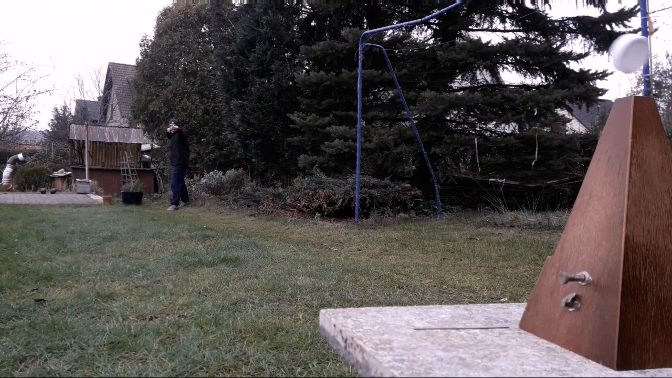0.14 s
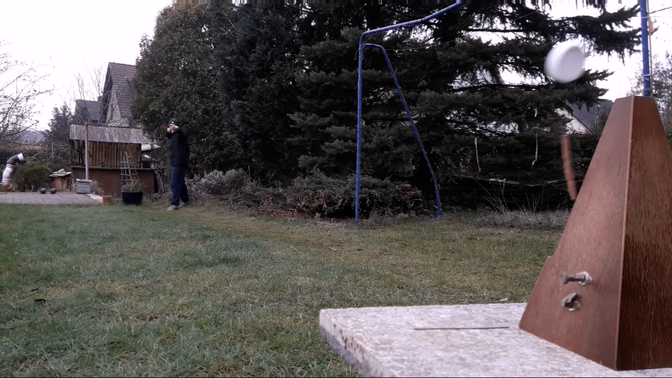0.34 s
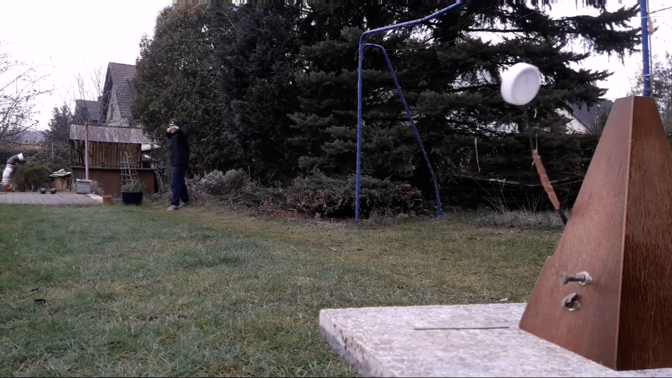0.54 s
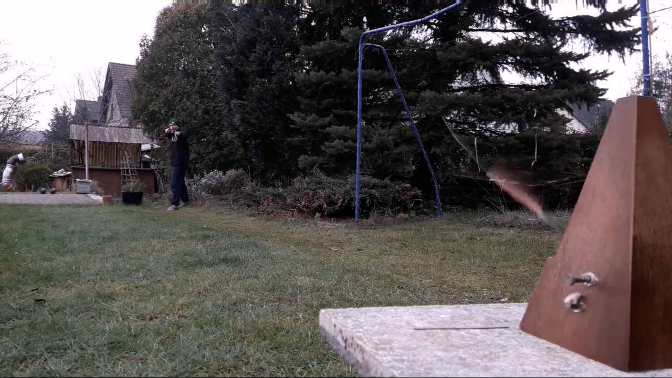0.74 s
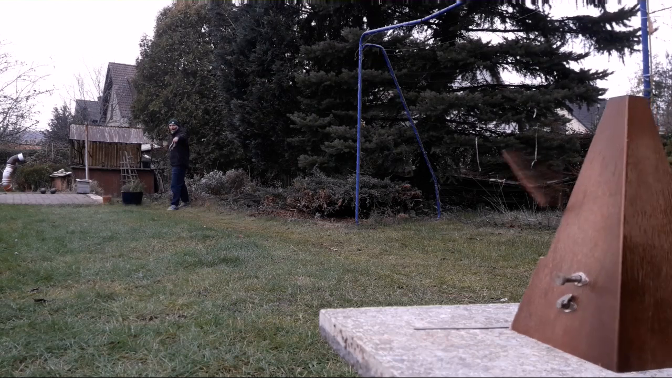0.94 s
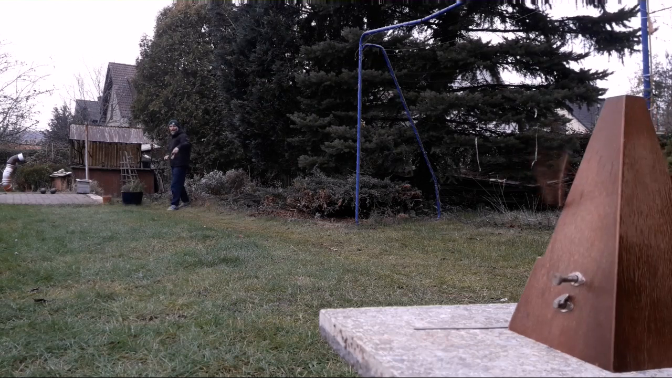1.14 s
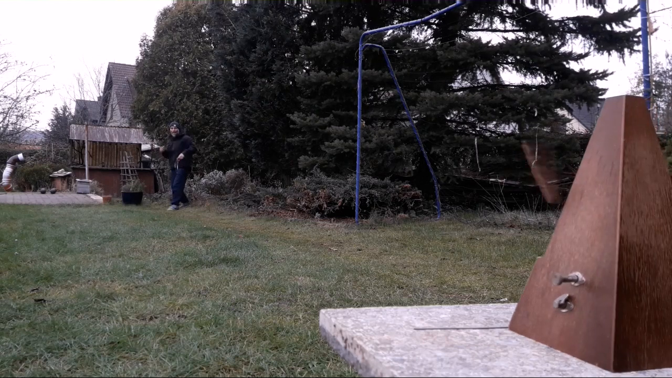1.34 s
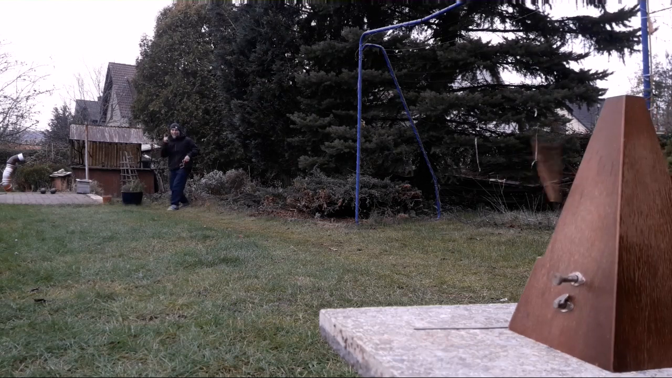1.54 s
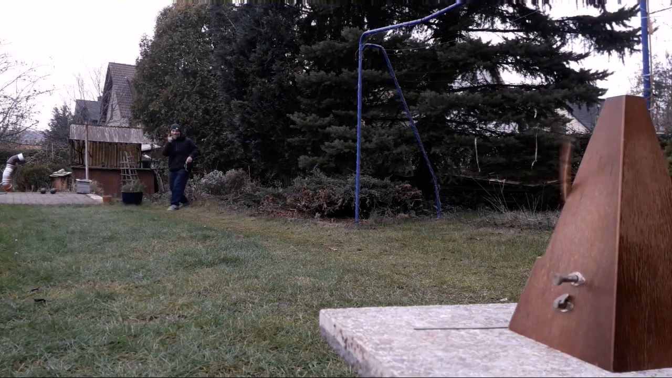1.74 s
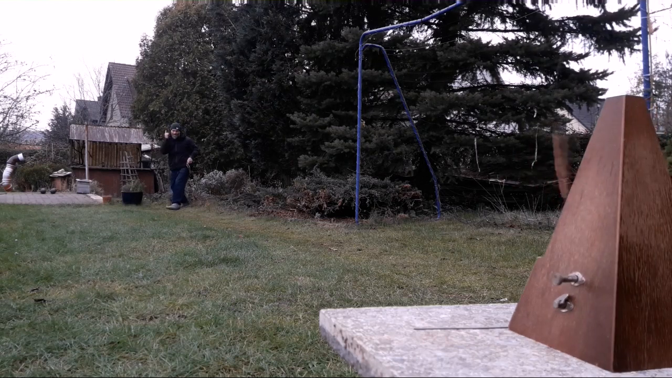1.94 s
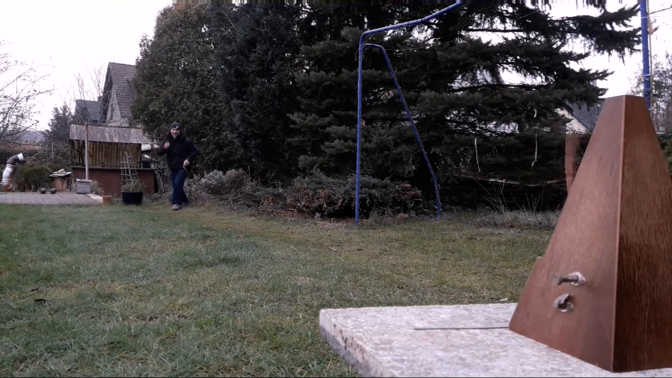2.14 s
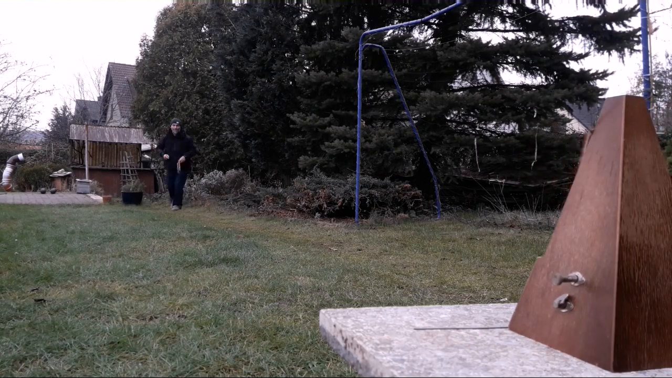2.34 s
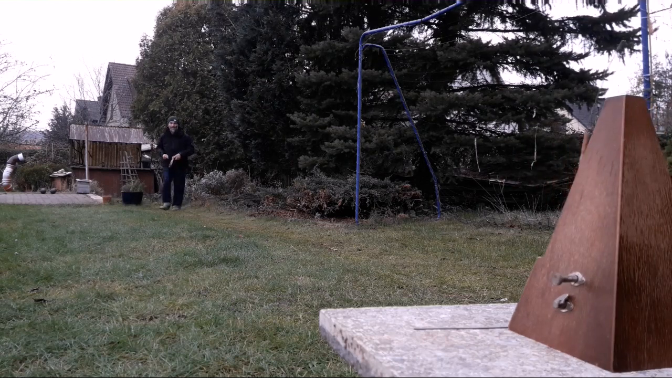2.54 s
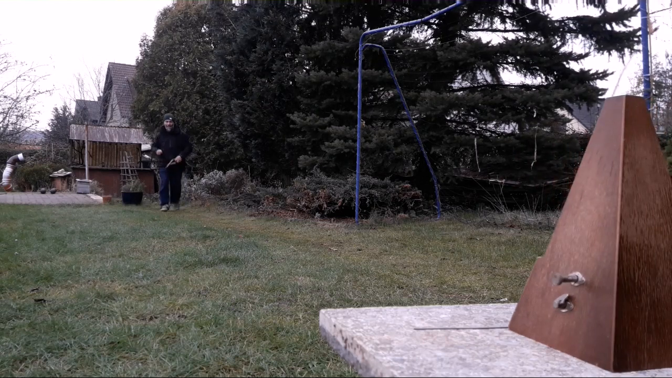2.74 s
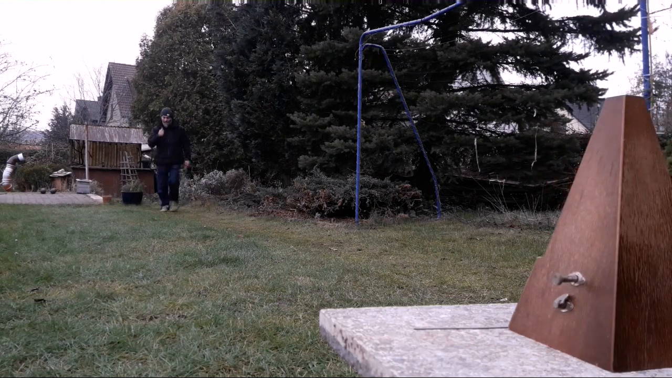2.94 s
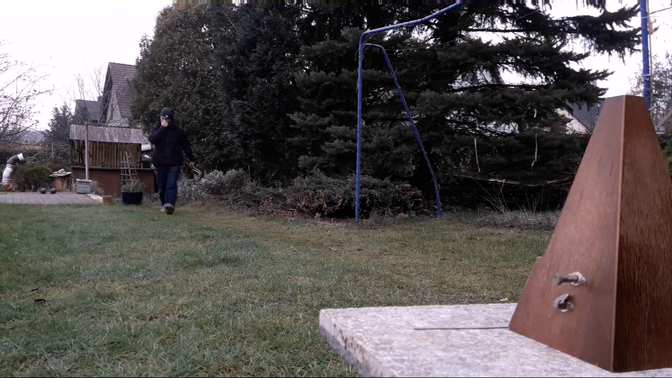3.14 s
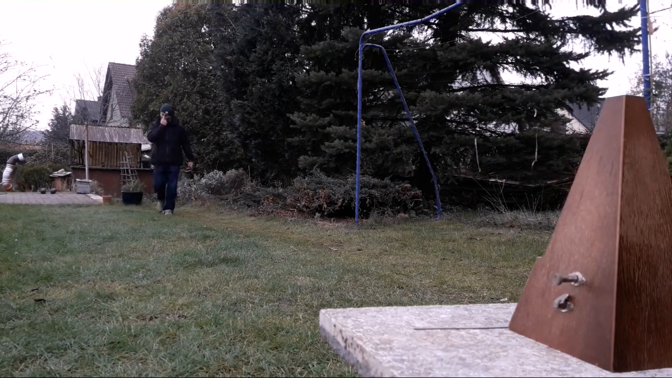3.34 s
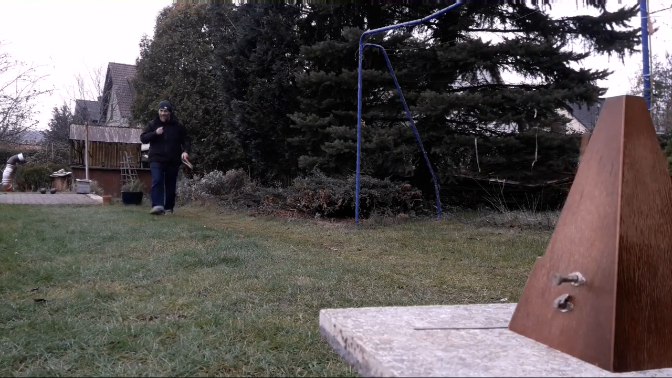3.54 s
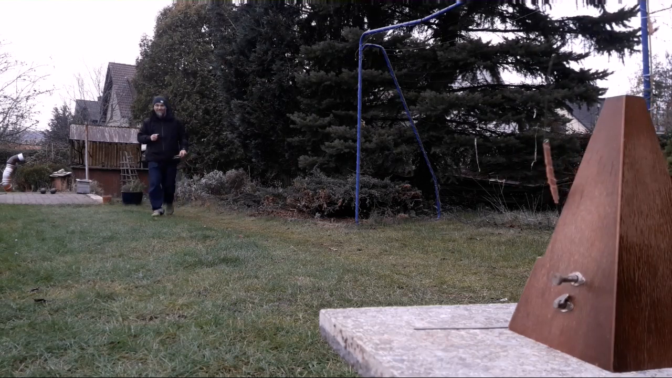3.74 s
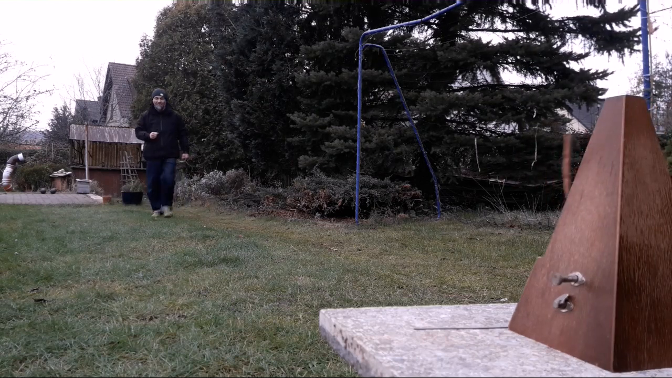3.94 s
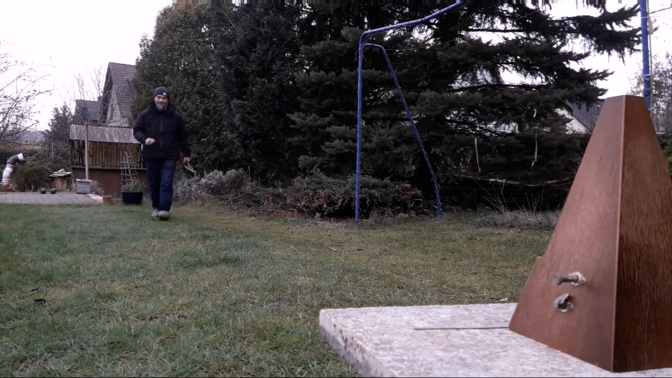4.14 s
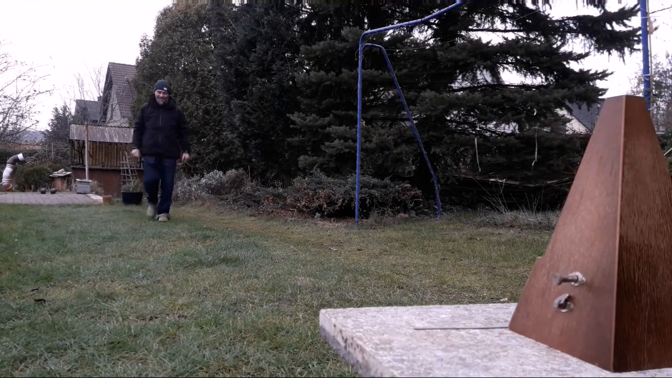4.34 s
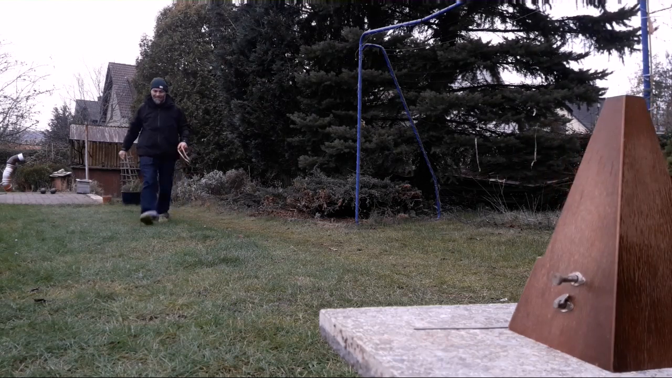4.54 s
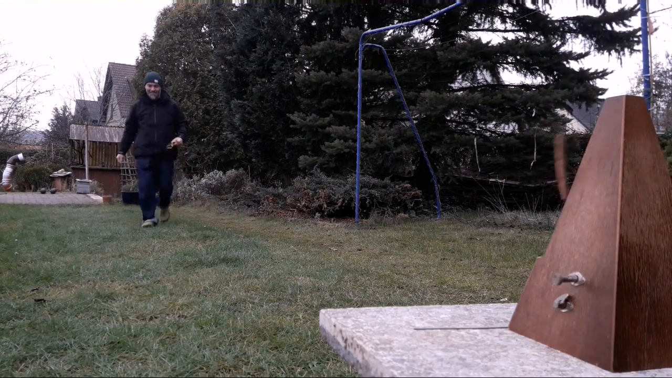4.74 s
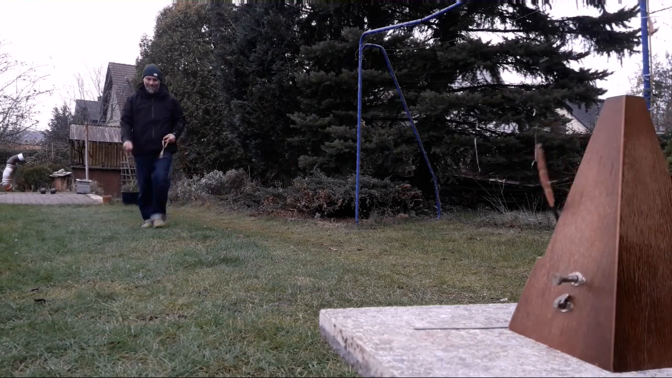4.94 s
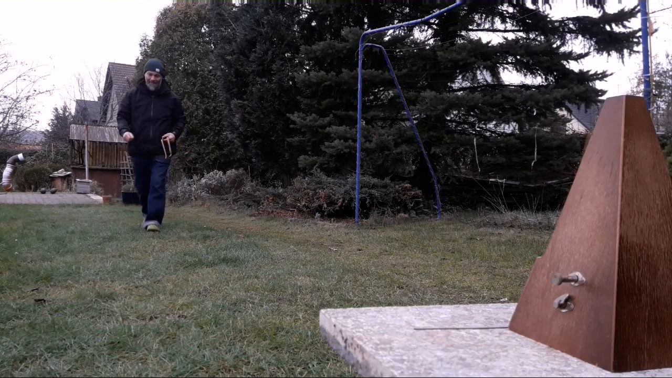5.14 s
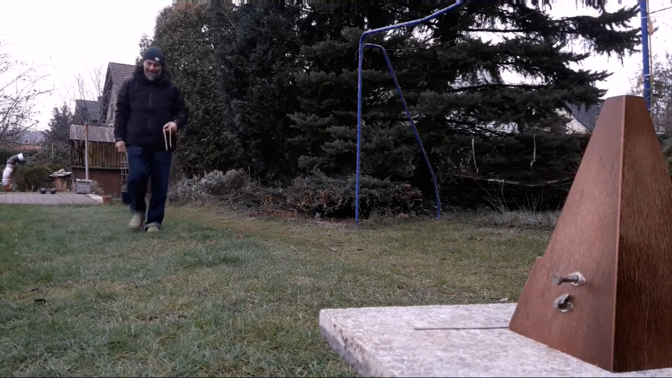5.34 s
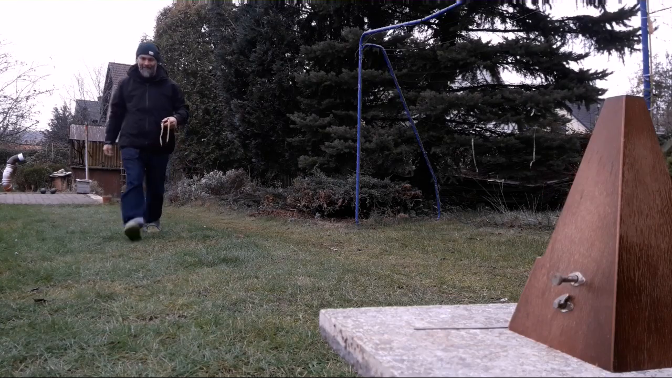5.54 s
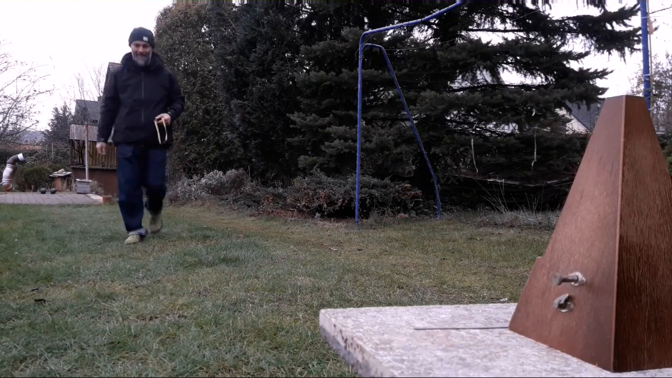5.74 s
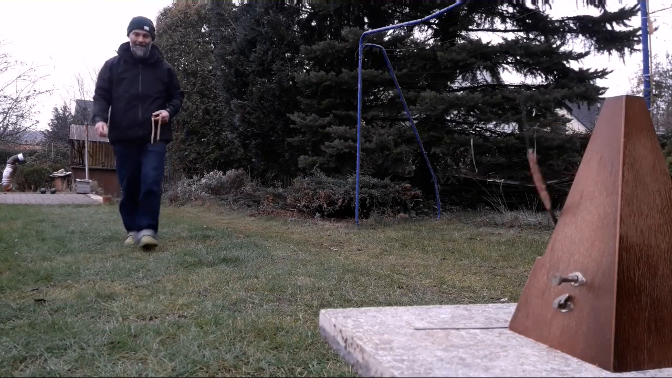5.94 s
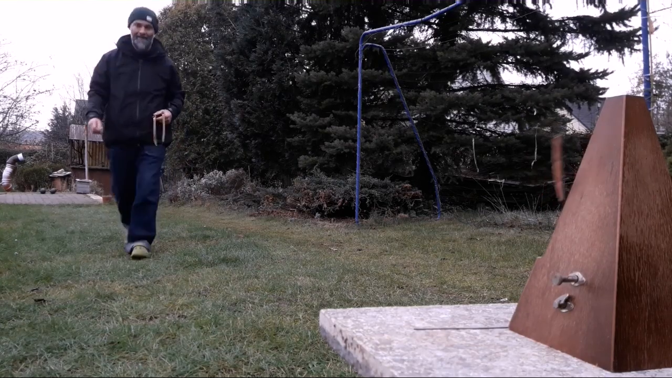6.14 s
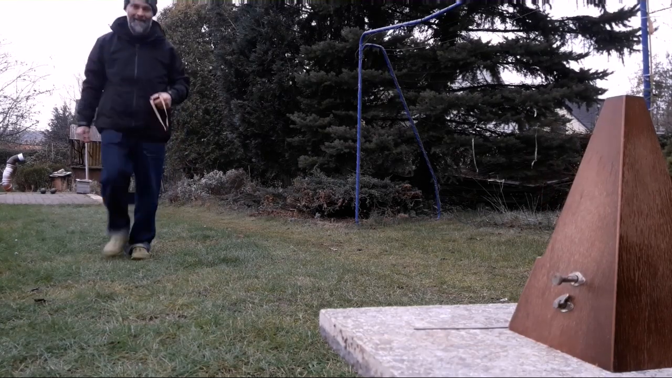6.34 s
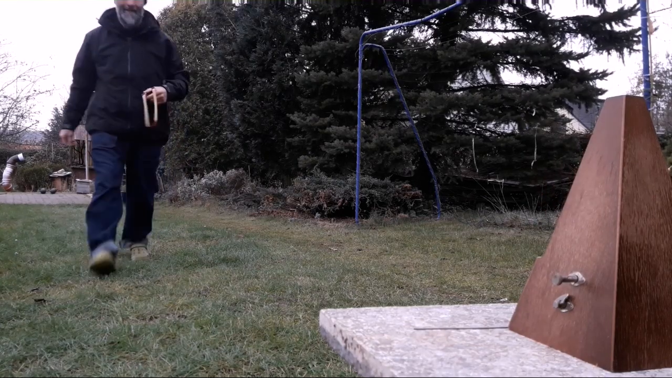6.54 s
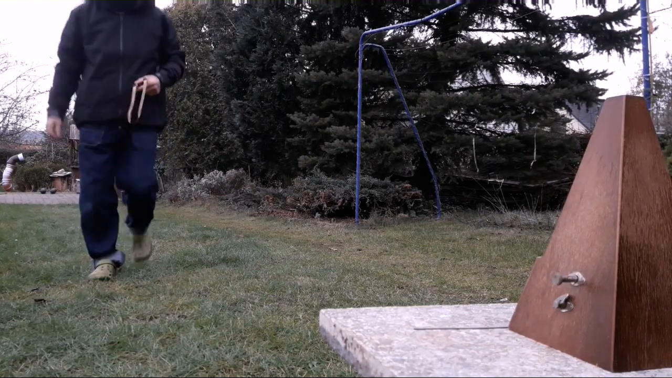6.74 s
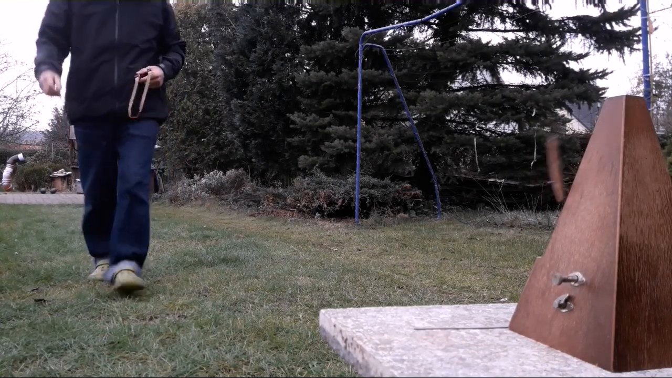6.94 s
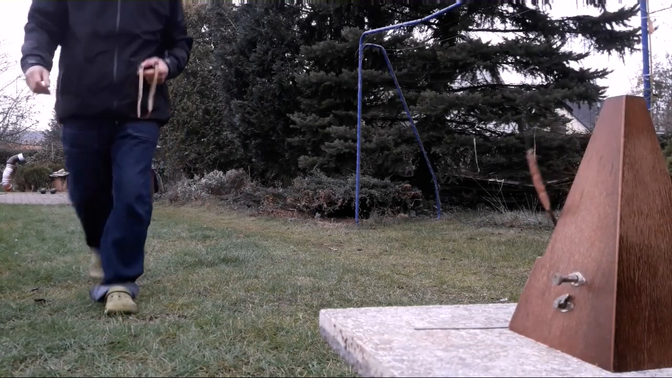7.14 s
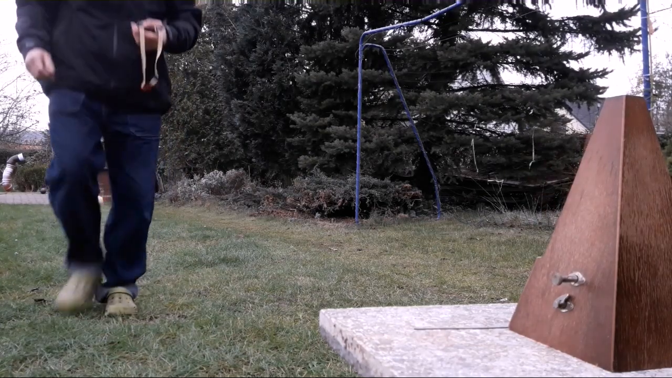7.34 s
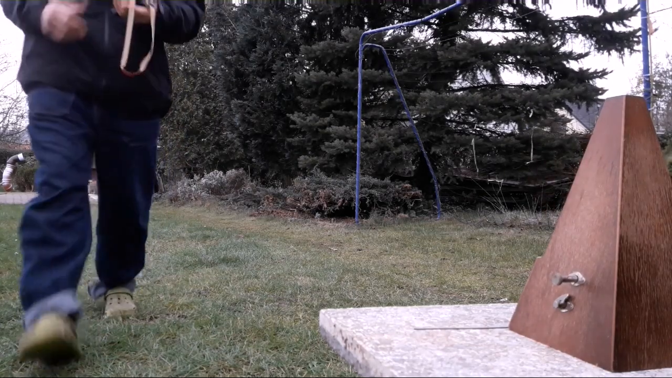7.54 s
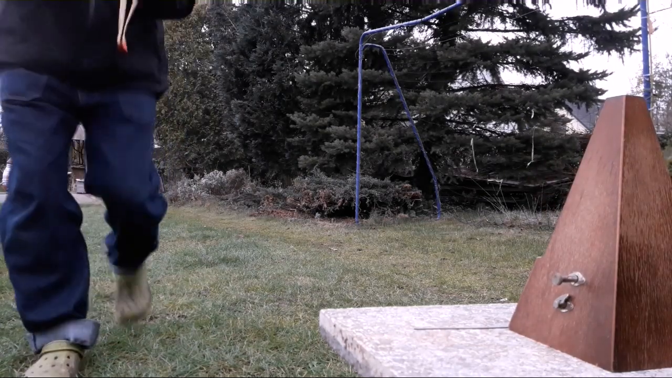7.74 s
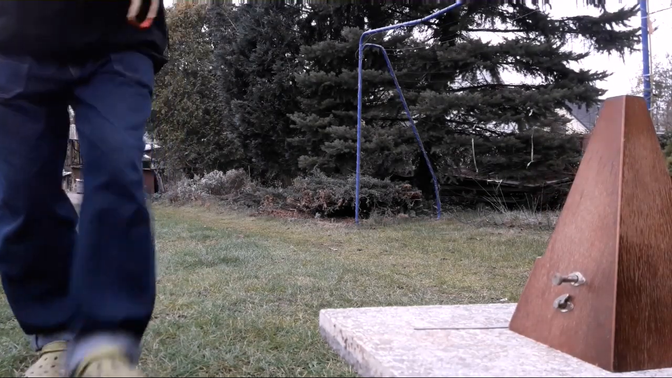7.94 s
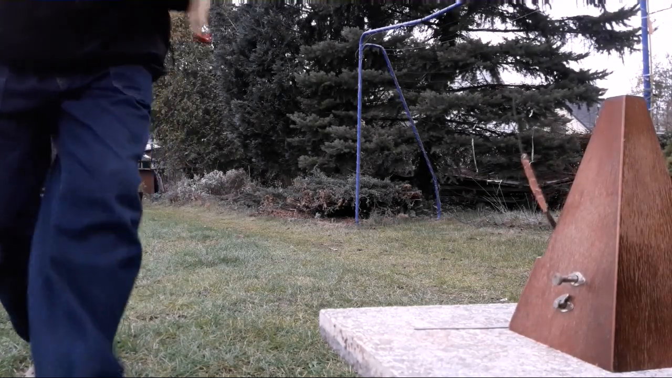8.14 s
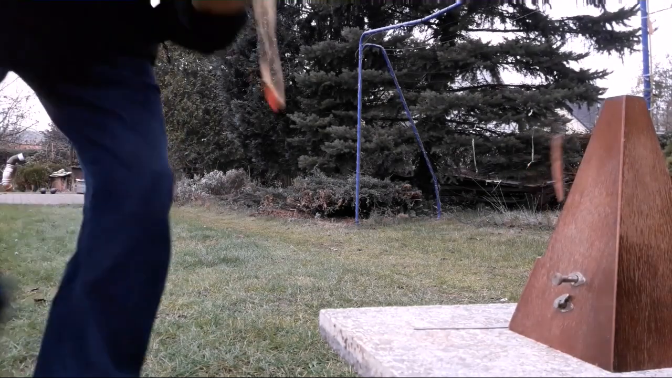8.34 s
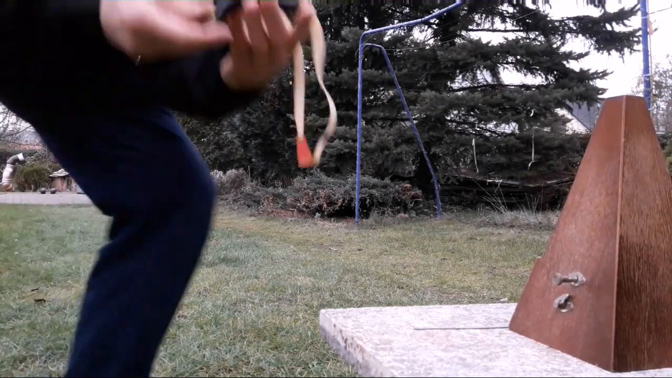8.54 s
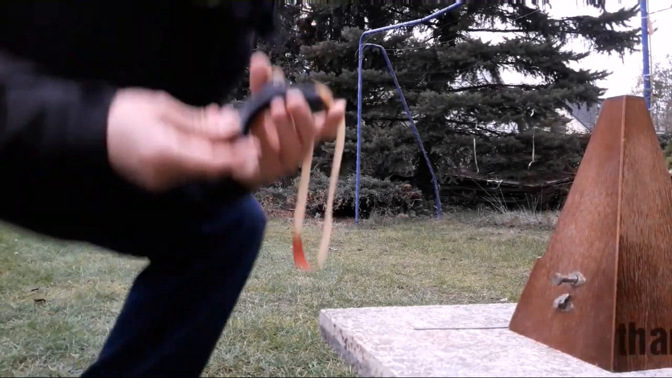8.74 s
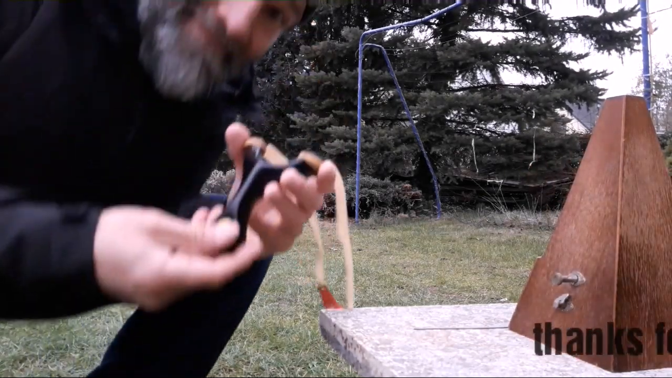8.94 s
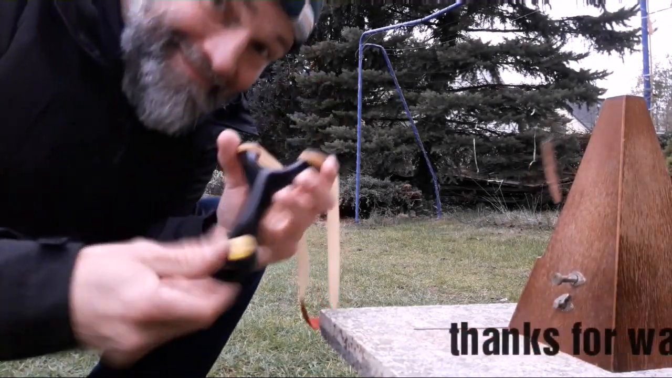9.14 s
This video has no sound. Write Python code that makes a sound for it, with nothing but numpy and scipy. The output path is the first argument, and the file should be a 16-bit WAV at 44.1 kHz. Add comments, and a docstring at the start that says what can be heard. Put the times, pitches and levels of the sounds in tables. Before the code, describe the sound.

A single crisp tock, then a sudden crack and a dense, heavy wooden clatter on a stone slab, with a low thump underneath. A loosened rod flutters in rapid weakening taps, then near silence before steady ticking, just under two per second. A walker approaches through grass from far to very near, jacket rustling and squeaking. Dry outdoor sound, close microphone, faint distant rumble and sparse short echoes.

```python
"""Metronome knocked on a garden slab

A wooden metronome ticks on a stone slab, close to the microphone: ringing wood, pin and rattling works.
A slingshot ball knocks a cap off its rod; the case slams, rocks and rattles, as bursts of noise on panels
and slab, until the beat settles. Someone walks up through grass in a rustling jacket (swelling noise,
squeaks), over distant traffic and air, with a sparse answer from walls and hedges."""
import sys
import numpy as np
from scipy import signal
from scipy.io import wavfile
from scipy.ndimage import uniform_filter1d

SR = 44100
rng = np.random.default_rng(int(sys.argv[2]) if len(sys.argv) > 2 else 0)


def dump(signal):
    """Clip the signal to [-1, 1] and save it as 16-bit WAV at the path in sys.argv[1]."""
    limited = np.clip(np.atleast_2d(signal).T, -1, 1)
    pcm = np.round(limited * 32767).astype(np.int16)
    wavfile.write(sys.argv[1], SR, pcm)


N = 409237  # samples, about 9.3 s

# All table levels are relative; each source sets its own overall level.
# distant traffic and air: hz [Hz], level_db [dB]
AIR_SPECTRUM = [(18, -39), (30, -9.5), (70, 1), (109, 0), (233, -14.5), (295, -16), (632, -23.5),
                (913, -23), (1390, -24.5), (2980, -28), (3490, -30), (6900, -38), (8520, -36.5),
                (14400, -41), (16000, -45)]
AIR_LEVEL_DB = -60.5
# dying away of the garden's answer: hz [Hz], t60_s [s]
GARDEN_DECAY = [(300, 0.056), (2000, 0.17), (8000, 0.17)]
# hiss of grass blades: hz [Hz], level_db [dB]
BLADE_SPECTRUM = [(3500, -48.5), (5200, -12), (7600, 1.5), (8800, 6), (10000, -5.5), (12600, -5.5),
                  (15000, 2), (16000, -9.5)]
# soles dragging over blades: hz [Hz], level_db [dB]
SCUFF_SPECTRUM = [(2500, -40), (3500, -9), (4800, -3.5), (6200, -2), (8000, -39.5)]
# duller body of cloth: hz [Hz], level_db [dB]
CLOTH_SPECTRUM = [(120, -40), (200, -11), (450, -5.5), (985, -9), (1640, -6.5), (2180, -8.5), (3590, -8.5),
                  (6000, -18), (7800, -41.5), (13200, -120)]
# swishes of grass under the tumbling cap, then of shoes and cloth: peak_s [s], hiss_db [dB],
# rise_s and fall_s [s per 20 dB of hiss], scuff_db and body_db [dB against hiss]
SWISHES = [(.5, -63.5, 0.22, 0.55, -14, -19), (.72, -50, .05, 0.28, -6.5, -12),
           (1.301, -71, 0.35, 0.44, -7, 11), (2.42, -65.5, 0.91, 1, -15, -0.5),
           (3.08, -63.5, 0.74, 0.33, -18, -13), (3.56, -61.5, 0.25, 0.19, -25, -12.5),
           (3.92, -55.5, 0.26, 0.28, -6.5, -9), (4.33, -50.5, 0.09, 0.2, -18.5, -10),
           (4.55, -59.5, 0.53, 0.17, -23.5, -14), (4.98, -53, 0.26, 0.22, -21, -18.5),
           (5.3, -56.5, 0.1, 0.37, -19.5, -12.5), (5.47, -44.5, 0.21, 0.18, -12, -20.5),
           (5.818, -52, 0.24, 0.5, -23, -17.5), (6.0, -65, 0.14, 0.21, -15, -2),
           (6.39, -46.5, 0.28, 0.34, -26, -17.5), (6.79, -47, 0.24, 0.23, -20.5, -18),
           (6.93, -53, 0.19, 0.11, -12, -14), (7.27, -54, 0.13, 0.18, -6.5, -7.5),
           (7.4, -47, 0.39, 0.24, -12, -13.5), (7.54, -40.5, 0.18, 0.31, -8, -10),
           (7.7, -41.5, 0.22, 0.27, -6.5, -11), (7.94, -48.5, 0.25, 0.19, -8.5, -9),
           (8.302, -43.5, .25, 0.9, -8, -5), (8.45, -34, 0.42, 0.32, -11, -12),
           (8.68, -46.5, 0.44, 0.51, -7.5, -1.5), (8.88, -48, 0.9, 0.29, -8, -9),
           (9.24, -39.5, 0.14, 0.15, -6.5, -14)]
SCUFF_STEEP, BODY_STEEP = 1.6, 1.4  # scuff and body swell and fade this much faster than the hiss
# squeaks of cloth or shoe: start_s [s], length_s [s], level_db [dB], from_hz [Hz], to_hz [Hz]
SQUEAK_EVENTS = [(7.24, 0.079, -54, 777, 990), (7.382, 0.056, -60, 2600, 2790),
                 (8.261, 0.089, -43, 1140, 1060), (8.308, 0.061, -40.5, 1610, 1900),
                 (8.391, .05, -45, 1080, 1400), (8.727, .11, -49, 1680, 1540),
                 (8.894, 0.058, -58.5, 794, 776)]
# modes of the slab and its stand: hz [Hz], level_db [dB], t60_s [s]
SLAB_MODES = [(91.26, -11.5, 0.18), (137, -11, 0.2), (255, -15.5, 0.038), (317, -20, 0.65), (393, -6, 0.22),
              (615, -19.5, 0.31)]
# blows heavy enough to move the slab: start_s [s], level_db [dB]
SLAB_BLOWS = [(0.672, -42.5), (0.783, 1.5), (0.792, -19), (0.837, -4), (1.018, -22), (1.561, -54),
              (2.173, -50)]
# something hollow bounces to rest: start_s [s], level_db [dB]
HOLLOW_BOUNCES = [(2.759, -56), (2.812, -63), (2.867, -74), (3.559, -66.5)]
# modes of the hollow thing: hz [Hz], level_db [dB], t60_s [s]
HOLLOW_MODES = [(621, 5.5, 0.31), (2430, -2, 0.068)]
# its contact: level_db [dB over the ring], treble_db [dB], wood_db [dB], t60_s [s], panel_hz [Hz]
HOLLOW_CONTACT = (18, 3, 0, 0.11, 1817)
# the freed rod quivers about twelve times a second and taps twice a swing:
# start_s [s], level_db [dB], return_after_s [s], return_db [dB]
ROD_SWINGS = [(1.075, -8, 0.022, -16), (1.152, -13, 0.026, -24.5), (1.23, -17, 0.03, -25),
              (1.313, -20.5, 0.026, -26), (1.396, -22, 0.028, -29.5), (1.481, -25, 0.022, -29.5),
              (1.561, -13, 0.035, -22), (1.644, -38, 0.036, -34), (1.731, -44.5, 0.035, -34.5),
              (1.819, -43, 0.031, -39), (1.907, -48, 0.031, -44), (1.997, -48, 0.027, -35),
              (2.081, -43, .028, -43), (2.17, -24.5, .025, -26), (2.258, -26, 0.024, -29),
              (2.348, -37, 0.02, -32), (2.435, -37.5, 0.019, -35.5), (2.518, -37, 0.025, -40)]
TAP_TREBLE_DB, TAP_WOOD_DB, TAP_T60_S = -5.5, -9.5, 0.045  # wood share is that of the loudest tap
SOFT_WOOD = 0.14  # dB more wood for each dB that a tap is weaker than the loudest
TAP_OUT_HZ, TAP_BACK_HZ = 1892, 1649  # nominal panels hit on the way out and back
CHATTER_S, CHATTER_DB = 0.014, -9  # the return tap bounces once
# the bands snap far off, the ball grazes and strikes the cap, its echo returns: start_s [s],
# level_db [dB], treble_db [dB], wood_db [dB, share through the wood], t60_s [s], panel_hz [Hz, nominal]
SHOT_BLOWS = [(.646, -34.5, 19.5, -2, 0.022, 1491), (.670, -24, 26.2, -16, 0.017, 1500),
              (.6741, -3, 3, -20, .012, 1500), (.677, -37, 16, -21.5, 0.21, 1511)]
# blows of cap and case, and a few stray taps later: start_s [s], level_db [dB], treble_db [dB],
# wood_db [dB, share through the wood], t60_s [s], panel_hz [Hz, nominal]
CASE_BLOWS = [(0.78, 5, -2, -13, 0.042, 800), (0.789, 4, 1, -16, 0.09, 1860), (0.8, 0, -3, -2, 0.22, 1660),
              (0.814, 4.5, -3, -24, 0.12, 1760), (0.827, -3, -3, -8.5, 0.12, 1460),
              (0.842, -5.5, 5, -2, 0.07, 607.5), (0.852, -16.5, 16, -2, 0.07, 1562),
              (0.862, -5.5, 4, -19, 0.099, 1800), (0.881, -9, -10, -21, 0.12, 2320),
              (0.926, -10, 6.5, 2.5, 0.063, 2080), (0.94, -6, -7, -3.5, 0.088, 1720),
              (0.951, -20.5, -16.5, 6.5, 0.034, 1740), (0.999, -5, -3.5, -7, 0.023, 1950),
              (1.015, 6, 2.5, -17, 0.046, 1180), (1.038, -22, -24, 8, 0.11, 1076),
              (1.277, -12.5, -2, -30, 0.04, 2300), (1.373, -33.5, -14, -5, 0.19, 960),
              (1.562, -19.5, -2, -3.5, 0.11, 770), (1.624, -37, -7, -5, 0.19, 676),
              (1.996, -46, -11, 8, 0.07, 1190), (2.596, -31.5, 11, 2, 0.04, 1835),
              (5.222, -48.5, 3, -7, 0.091, 643), (5.808, -48, -2.5, 1, 0.051, 1840),
              (7.852, -50.5, -4, -1.5, 0.16, 770), (8.225, -30.5, 9.5, -8, 0.021, 1170),
              (8.995, -40.5, -0.5, -7, 0.035, 651)]
# direct sound of the tiny collisions: hz [Hz], level_db [dB]
CLATTER_SPECTRUM = [(120, -34), (200, -10), (400, -16), (900, -14), (1500, -11.5), (3500, -10), (5300, -14),
                    (8700, -6), (11000, -19), (16000, -37)]
PANEL_T60_S, PANEL_SPREAD = 0.022, 0.04  # each blow lands a little elsewhere: random share of panel_hz
# escapement beats, a little uneven from side to side: start_s [s], level_db [dB],
# pin_db [dB, pin against wood]
ESCAPEMENT_BEATS = [(0.4238, -11.5, 1), (3.1811, -10, -1), (3.7429, -8, -1.5), (4.2651, -10.5, 2),
                    (4.829, -9, 1), (5.3544, -8, 1), (5.919, -9, -2), (6.4403, -8, 1.5),
                    (7.0023, -9.5, 2.5), (7.5311, -7.5, 2), (8.0967, -10, 4), (8.625, -5, 5.5),
                    (9.184, -9, 3)]
# modes of the wooden case: hz [Hz], level_db [dB], t60_s [s, before the pin stills the case]
CASE_MODES = [(312, -12, 0.039), (564, -56, 0.0057), (856, -5, 0.023), (1220, -32, 0.067),
              (1390, -6, 0.054), (1720, -43, 0.067), (1826, 18, 0.05), (2210, -34, 0.016),
              (2339, 13, 0.054), (2440, -17, 0.089), (2720, -1.5, 0.12), (2870, -38.5, 0.031),
              (3726, 2.5, 0.064), (4058, 7, 0.044), (3990, 0, 0.073), (5620, -57, 0.045),
              (6480, -18, 0.045)]
# the panel under the works gives one dead swing: hz [Hz], level_db [dB], t60_s [s]
PANEL_SWING = [(2100, 0, .006)]
# rattle of the works: hz [Hz], level_db [dB]
RATTLE_SPECTRUM = [(200, -18.5), (600, -11), (1200, -4.5), (2200, -1), (3200, -8.5), (5000, -9.5),
                   (7500, -12), (16000, -20)]
# modes of the escapement pin: hz [Hz], level_db [dB], t60_s [s]
PIN_MODES = [(6750, -3, .008), (7200, -5, .007), (7900, -6, .007), (8300, 0, .009), (8900, -10, .006)]
# the pin touches, drops and rebounds within a beat: delay_s [s, nominal], level_db [dB, nominal]
PIN_REBOUNDS = [(-.002, -32), (0, 0), (.0021, -6), (.0057, -4), (.0108, -11)]
# side channel against mid: hz [Hz], level_db [dB]
SIDE_SPECTRUM = [(60, -41.5), (400, -32), (2000, -22), (6000, -19), (15000, -12)]
EDGE_HZ = 16300  # upper band limit
HELD_PEAK_FALL_DB_PER_S = 9  # how fast the gain control lets go of a past peak level


def amp(db):
    """Gain of a level in dB."""
    return 10 ** (np.asarray(db) / 20)


def evened(x):
    """Scaled to rms 1."""
    return x / np.sqrt(np.mean(x ** 2) + 1e-20)


def read(points, hz):
    """A table read on a log-frequency axis."""
    f, value = np.transpose(points)
    return np.interp(np.log(hz + 1), np.log(f + 1), value)


def add(mix, s, sound):
    """Mixes a sound in at time s."""
    part = mix[round(s * SR):][:len(sound)]
    part += sound[:len(part)]


def colour(points):
    """Causal (minimum-phase) impulse response of energy 1 with the given spectrum."""
    level_db = np.maximum(read(points, abs(np.fft.fftfreq(4096, 1 / SR))), -90)
    spectrum = np.exp(np.conj(signal.hilbert(np.log(amp(level_db)))))
    response = np.fft.ifft(spectrum).real[:2048]
    return response / np.linalg.norm(response)


def ring(modes, spread_db=0, size=3000):
    """Dying sines struck together, peak 1; mode levels vary at random by spread_db."""
    t = np.arange(size) / SR
    hz, db, t60 = np.transpose(modes)[:, :, None]
    db = db + spread_db * rng.standard_normal(db.shape)
    x = (amp(db - 60 * t / t60) * np.sin(2 * np.pi * hz * t)).sum(0)
    return x / abs(x).max()


def noise(points, patchy_db, flicker_db, size=512):
    """Noise with drifting patches and a flicker shared by all pitches."""
    frames, hz = 4 * N // size + 5, np.fft.rfftfreq(size, 1 / SR)
    a, b, patches = rng.standard_normal((frames, len(hz), 3)).T
    patches = uniform_filter1d(patches, 8, 0)  # across pitch
    patches = evened(uniform_filter1d(patches, 12, 1))  # across time
    flicker = evened(uniform_filter1d(rng.standard_normal(frames), 3))
    level_db = read(points, hz)[:, None] + patchy_db * patches + flicker_db * flicker
    x = signal.istft((a + 1j * b) * amp(level_db), nperseg=size, noverlap=3 * size // 4)[1]
    return evened(x[:N])


def distant_air():
    """Low, slightly flickering noise of distant traffic and air."""
    return amp(AIR_LEVEL_DB) * noise(AIR_SPECTRUM, patchy_db=1.13, flicker_db=2.5, size=2048)


def garden(x):
    """Walls and hedges answer from about 30 ms on: sparse echoes, each pitch dying at its own rate."""
    echoes = np.zeros(SR // 2)
    at = np.arange(1300, len(echoes) - 20, 20)
    echoes[at + rng.integers(0, 20, len(at))] = rng.choice([-1., 1.], len(at))
    hz, t, z = signal.stft(echoes, SR, nperseg=256)
    decay = amp(-60 * t / read(GARDEN_DECAY, hz)[:, None])
    tail = signal.istft(z * decay, SR, nperseg=256)[1]
    return signal.oaconvolve(x, tail / np.linalg.norm(tail))[:N]


def rustle():
    """Hiss of blades, scuffing soles and the duller body of cloth swell with each stride."""
    s, hiss_db, rise, fall, scuff_db, body_db = np.transpose(SWISHES)[:, :, None]
    t = np.arange(0, N, 64) / SR
    away_db = -20 * np.maximum((s - t) / rise, (t - s) / fall)

    def swell(db):
        """Swishes overlap by adding their powers."""
        return np.interp(np.arange(N) / SR, t, np.linalg.norm(amp(db), axis=0))

    hiss = swell(hiss_db + away_db)
    scuff = swell(hiss_db + scuff_db + SCUFF_STEEP * away_db)
    body = swell(hiss_db + body_db + BODY_STEEP * away_db)
    grass = hiss * noise(BLADE_SPECTRUM, patchy_db=-0.94, flicker_db=1.07)
    grass += scuff * noise(SCUFF_SPECTRUM, patchy_db=6.0, flicker_db=0.5)
    return grass + body * noise(CLOTH_SPECTRUM, patchy_db=1.5, flicker_db=1.5)


def squeak(length, db, from_hz, to_hz, width_hz=180):
    """Stick and slip: broken rubbing noise in a narrow gliding band, with its octave."""
    hz = np.linspace(from_hz, to_hz, round(length * SR))
    turn = np.exp(2j * np.pi * np.cumsum(hz) / SR)
    r = np.exp(-np.pi * width_hz / SR)
    rub, grip = rng.standard_normal((2, 8000))[:, :len(hz)]
    # two equal poles at zero pitch, carried along the glide
    band = turn * signal.lfilter([1], np.convolve([1, -r], [1, -r]), rub / turn)
    tone = evened(band.real) + amp(-11) * evened((band ** 2).real)  # squaring doubles the pitch
    broken_db = 1.8 * evened(uniform_filter1d(grip, 300))
    return amp(db + broken_db) * tone * signal.windows.tukey(len(hz), 0.7)


def slab():
    """A soft push, then the low ring of the slab."""
    out = np.zeros(N)
    u = np.arange(800) / SR / 0.0011
    push = u * (2 - u) * np.exp(-u)
    for s, db in SLAB_BLOWS:
        add(out, s, -amp(db + 1) * push)
        add(out, s, -amp(db - 12) * ring(SLAB_MODES, spread_db=1, size=20000))
    return out


def hollow_ring():
    """The hollow thing sounds its two modes at each bounce."""
    out = np.zeros(N)
    for s, db in HOLLOW_BOUNCES:
        add(out, s, amp(db) * ring(HOLLOW_MODES, size=9000))
    return out


def light_taps():
    """Contacts of hollow thing and quivering rod, in the columns of the case blows; soft taps are woodier."""
    contact_db, *contact = HOLLOW_CONTACT
    hollow = [(s, db + contact_db, *contact) for s, db in HOLLOW_BOUNCES]
    hits = []
    for s, db, lag, back_db in ROD_SWINGS:
        hits.append((s, db, TAP_OUT_HZ))
        hits.append((s + lag, back_db, TAP_BACK_HZ))
        hits.append((s + lag + CHATTER_S, back_db + CHATTER_DB, TAP_OUT_HZ))
    top_db = max(db for s, db, hz in hits)
    rod = []
    for s, db, hz in hits:
        wood_db = TAP_WOOD_DB + SOFT_WOOD * (top_db - db)
        rod.append((s, db, TAP_TREBLE_DB, wood_db, TAP_T60_S, hz))
    return hollow + rod


def knocks():
    """Bursts of tiny collisions, heard directly and through the panel that is hit."""
    dull, bright, wood = np.zeros((3, N))
    t = np.arange(8000) / SR
    onset = 1 - np.exp(-t / 0.0011)
    main_hz = CASE_MODES[6][0]
    for s, db, treble_db, wood_db, t60, hz in SHOT_BLOWS + CASE_BLOWS + light_taps():
        grit, lumps = rng.standard_normal((2, len(t)))
        uneven_db = 2.2 * evened(uniform_filter1d(lumps, 60))  # collisions come in clumps
        burst = amp(db - 9.5 - 60 * t / max(t60, 0.004) + uneven_db) * onset * grit
        panel_hz = hz * (1 + PANEL_SPREAD * lumps[0])
        # the panel, with a trace of the main mode of the case
        panel = ring([(panel_hz, 0, PANEL_T60_S), (main_hz, -5, PANEL_T60_S)], size=2000)
        add(dull, s, burst)
        add(bright, s, amp(treble_db) * burst)
        add(wood, s, amp(wood_db) * signal.oaconvolve(burst, panel / np.linalg.norm(panel)))
    low = signal.butter(3, 5000, fs=SR, output="sos")
    high = signal.butter(3, 5000, "high", fs=SR, output="sos")
    direct = signal.sosfilt(low, dull) + signal.sosfilt(high, bright)
    return wood + signal.oaconvolve(direct, colour(CLATTER_SPECTRUM))[:N]


def metronome():
    """One blow rings the wood; the pin rebounds unevenly, the works rattle. Also the cracks that carry far."""
    near, far = np.zeros((2, N))
    crack, t = colour(RATTLE_SPECTRUM), np.arange(3000) / SR
    spreading = 1 - np.exp(-(t / 0.00035) ** 2)  # the blow takes a moment to reach every panel
    settling = np.exp(-(t / 0.022) ** 2)  # the pin comes to rest on the wheel and stills the case
    touch = np.minimum(t / 0.00027, 1)
    for s, db, pin_db in ESCAPEMENT_BEATS:
        add(near, s, amp(db - 4.5) * ring(CASE_MODES, spread_db=3) * spreading * settling)
        add(near, s, amp(db + 3) * ring(PANEL_SWING) * spreading)
        grit = np.convolve(rng.standard_normal(len(t)), crack)[:len(t)]
        rattle = amp(db - 60 * t / 0.061) * grit
        add(near, s, amp(-19) * rattle)
        add(far, s, amp(-6) * rattle)
        for delay, rebound_db in PIN_REBOUNDS:
            late, weak = rng.standard_normal(2) * abs(delay)  # later rebounds vary more
            pin = ring(PIN_MODES, spread_db=15.5) * touch
            add(near, s + delay + 0.082 * late, amp(db + rebound_db + pin_db + 75 * weak) * pin)
    return near, far


def scene():
    """All sources around the slab; the two channels differ only faintly, by a side of random phase."""
    beats, far_cracks = metronome()
    clatter = knocks() + hollow_ring()
    rubs = rustle()
    for start, *row in SQUEAK_EVENTS:
        add(rubs, start, squeak(*row))
    answer = amp(-27.5) * garden(far_cracks + clatter)
    mono = distant_air() + answer + rubs + slab() + clatter + beats
    hz, t, z = signal.stft(mono, SR, nperseg=256)
    random_phase = np.exp(2j * np.pi * rng.random(z.shape))
    side = signal.istft(z * amp(read(SIDE_SPECTRUM, hz))[:, None] * random_phase, nperseg=256)[1][:N]
    return np.array([mono + side, mono - side])


def record(dry):
    """Microphone roll-offs and preamplifier hiss; gain dips after loud peaks, peaks round off; band limit."""
    heard = signal.sosfilt(signal.butter(2, 45, "high", fs=SR, output="sos"), dry)
    softened = signal.sosfilt(signal.butter(8, 10000, fs=SR, output="sos"), heard)
    heard = 0.12 * heard + 0.88 * softened
    heard = heard + amp(-85.5) * rng.standard_normal(N)  # hiss of the preamplifier, alike in both channels
    power_db = 10 * np.log10(abs(uniform_filter1d((heard ** 2).mean(0), 2000)) + 1e-12)
    fall_db = np.arange(N) * HELD_PEAK_FALL_DB_PER_S / SR
    held_db = np.maximum.accumulate(power_db + fall_db) - fall_db
    over_db = np.maximum(held_db + 25, 0)  # excess above -25 dB
    dip_db = 0.5 * signal.lfilter([0.0003], [1, 0.0003 - 1], over_db)  # follows within about 76 ms
    rounded = np.tanh(heard / amp(dip_db))
    band_limit = signal.firwin(511, EDGE_HZ, window=("kaiser", 9), fs=SR)
    return signal.oaconvolve(rounded, band_limit[None], "same")


dry = scene()
out = record(dry)
dump(out)
```